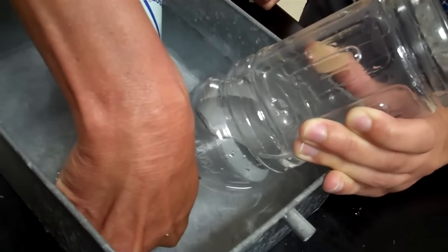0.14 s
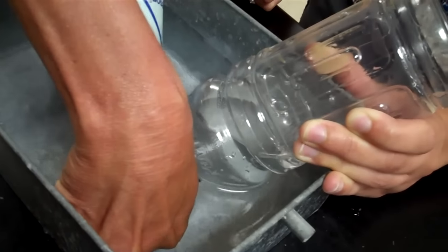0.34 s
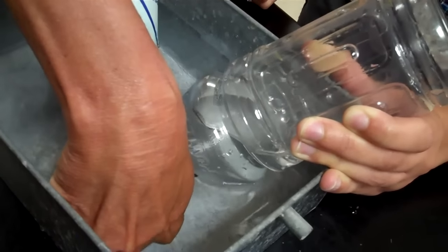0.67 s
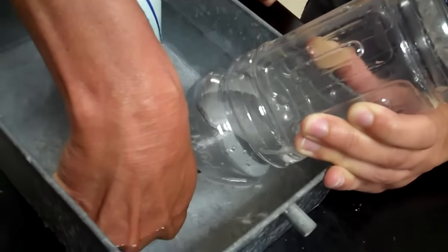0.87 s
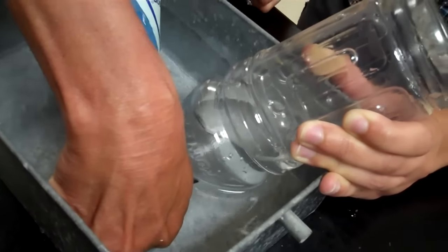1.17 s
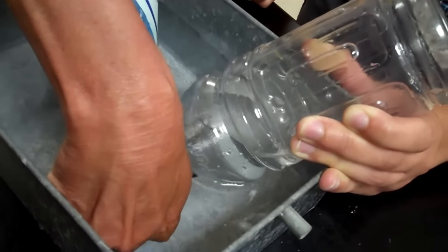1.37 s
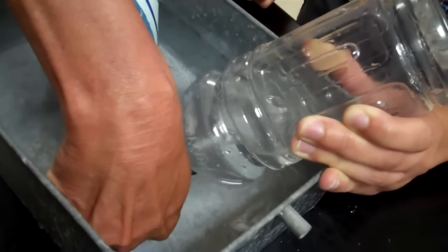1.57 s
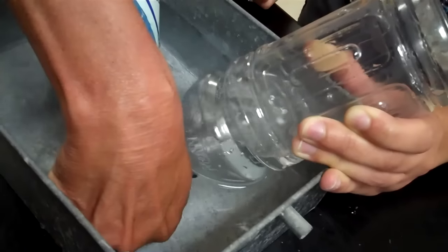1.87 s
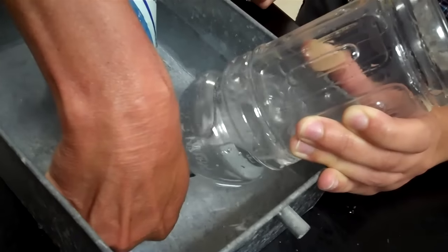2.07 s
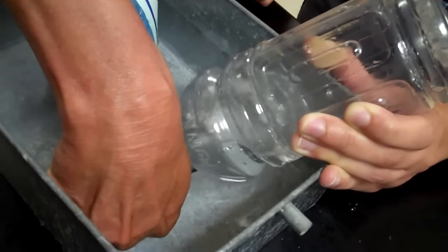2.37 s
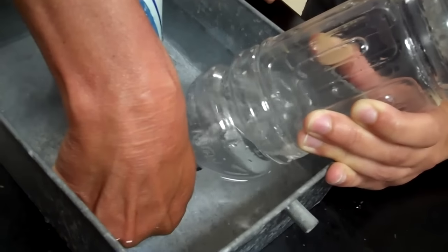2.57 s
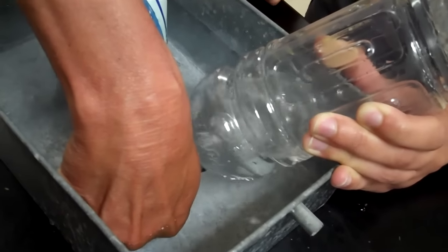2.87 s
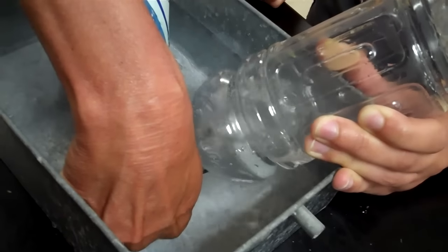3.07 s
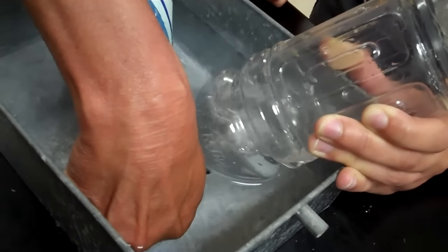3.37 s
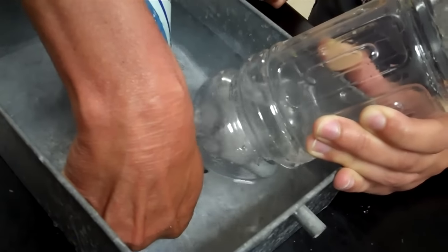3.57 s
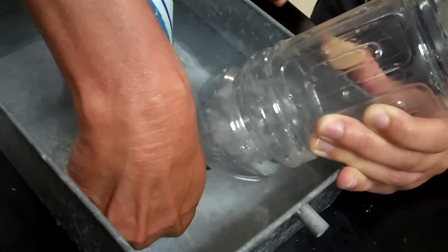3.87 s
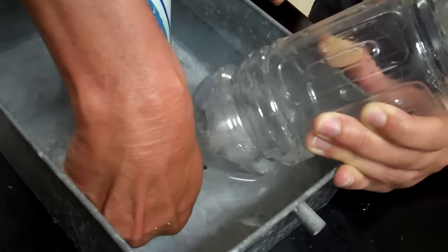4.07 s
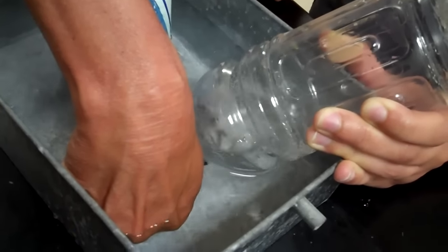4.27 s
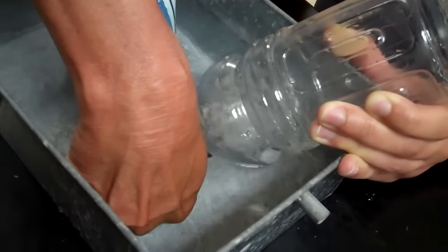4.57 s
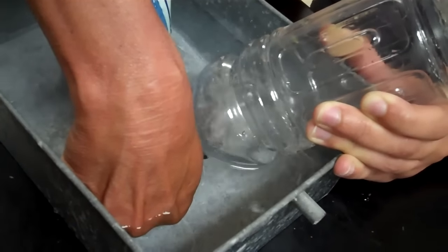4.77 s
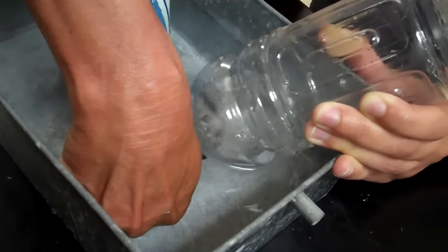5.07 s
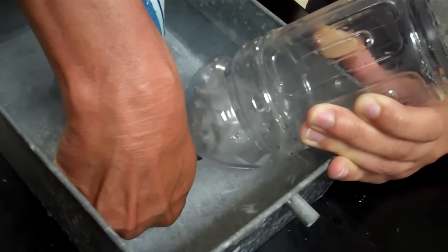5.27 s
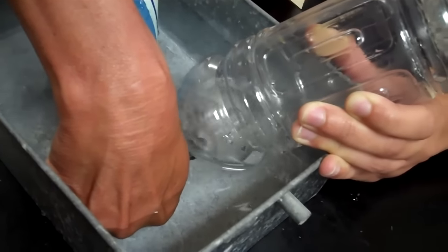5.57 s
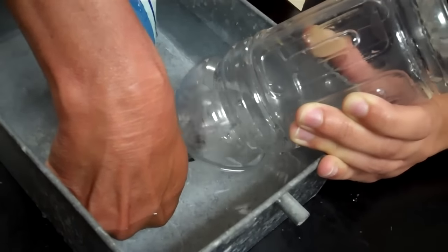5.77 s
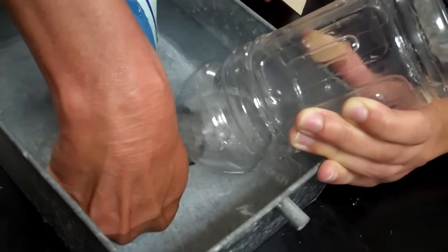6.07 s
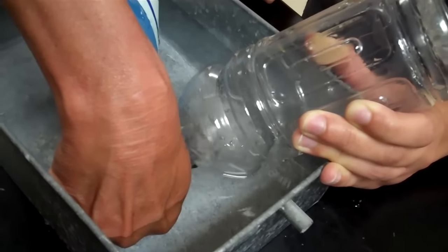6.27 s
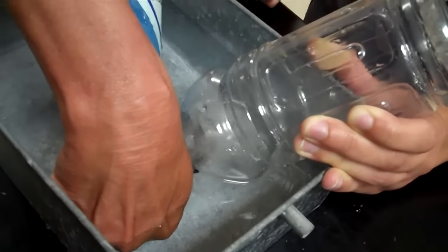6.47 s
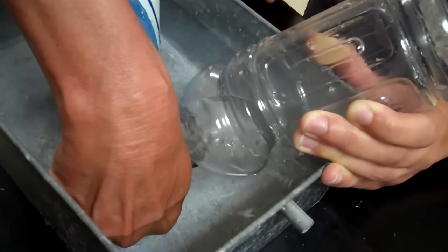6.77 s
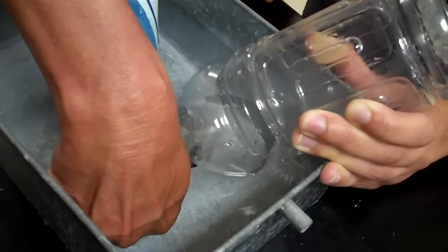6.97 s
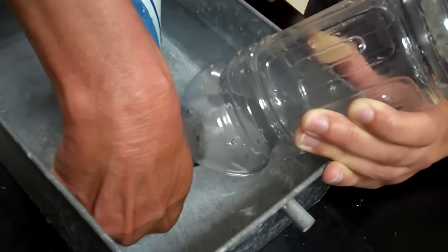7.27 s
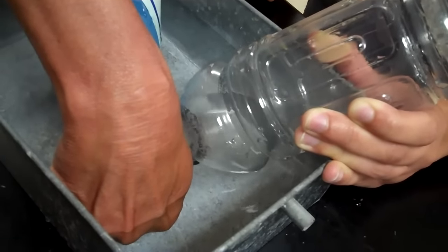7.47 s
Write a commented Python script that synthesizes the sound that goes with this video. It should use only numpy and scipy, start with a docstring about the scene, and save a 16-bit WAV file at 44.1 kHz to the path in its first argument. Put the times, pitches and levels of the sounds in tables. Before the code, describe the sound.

Gas bubbles steadily into an upturned plastic bottle in a tub of water, glugging rapidly with small sharp pops.

```python
"""Gas from a can bubbles into an upturned plastic bottle in a metal tub of water, close to a camera.
First a faint hiss fades away in a quiet room. From 1.25 s large bubbles leave the nozzle many times a
second; each oscillates as a spring of gas loaded by water and excites the bottle's resonances. Smaller
ones split off and ring higher, and tiny ones burst at the surface with sharp ticks. From about 5 s to
7.2 s the gas drives out most of the water: the resonances shift and the bubbles decay sooner."""
import sys
import numpy as np
from scipy import signal
from scipy.fft import rfft, irfft, next_fast_len
from scipy.io import wavfile

SR = 44100
rng = np.random.default_rng(int(sys.argv[2]) if len(sys.argv) > 2 else 0)


def to_wav(sig):
    """Store sig (one row per channel, or 1-D mono) as 16-bit WAV at the path in sys.argv[1].

    Samples outside -1..1 are clipped; the rate is SR.
    """
    pcm = np.clip(np.atleast_2d(sig), -1, 1) * 32767
    pcm = np.round(pcm).astype(np.int16)
    wavfile.write(sys.argv[1], SR, pcm.T)  # frames by channels


N = 336483

# room air and microphone hiss: (frequency [Hz], relative spectral level [dB])
AIR_SPECTRUM = [(12, -32), (20, -10.5), (102, -16.5), (142, -7), (210, -8.5), (247, -9), (326, -16),
                (364, -10), (454, -16), (707, -9), (985, -16.5), (3230, -27), (7010, -30.5), (13600, -34.5),
                (14800, -37)]
# likeness of that noise in left and right: (frequency [Hz], correlation [-1..1])
AIR_CORRELATION = [(60, 0.66), (180, 0.98), (540, 0.84), (1600, 0.48), (4790, -0.1), (14300, 0.0078)]
# hiss before the flow starts: (time [s], level [dB])
LEAK_LEVELS = [(0.03, -76), (0.218, -64.5), (0.4, -67), (0.55, -80)]
# its band filter, applied twice: (frequency [Hz], bandwidth [Hz], gain [dB])
LEAK_MODES = [(5080, 320, 3.6), (6160, 330, 0.57)]
# bottle and tub resonances at three water levels: (frequency [Hz], bandwidth [Hz], gain [dB])
FULL_MODES = [(264.6, 27, 5.5), (448.7, 27.5, 10), (573, 80, 1.5), (846, 15.4, 3), (1210, 90, -6),
              (1604, 71, 5), (2170, 30, -4), (2530, 42, -1.5)]
HALF_MODES = [(271, 57, -1.5), (459, 44, 5), (616, 110, -1.5), (850, 28, 8), (1210, 130, -5),
              (1694, 160, 8), (2650, 60, -11)]
DRAINED_MODES = [(258, 92, 4.5), (460, 150, 7), (650, 260, 2.5), (920, 180, 8), (1250, 130, -2.5),
                 (1683, 84, 10.5), (2640, 67, -14)]
# relative levels of the froth: (time [s], large bubbles [dB], middling bubbles [dB], fizz [dB])
FROTH_LEVELS = [(1.25, -71, -36, -77), (1.39, -55, -45.5, -72), (2.81, -52.5, -44, -66.5),
                (4.61, -53, -40, -60), (6.31, -52.5, -42.5, -59.5), (7.63, -68.5, -44, -62.5)]
# colour of the fizz: (frequency [Hz], gain [dB])
FIZZ_FILTER = [(3000, 11), (4500, -8), (6300, 6), (8200, 6.5), (9500, 4), (14000, -32)]
# tiny bubbles bursting at the surface:
# (time [s], peak level [dB], frequency [Hz], length [cycles], left over right [dB], splash re peak [dB])
BURSTS = [(1.246, -43.5, 3680.0, 8.3, -5, 6), (1.6555, -44, 7640, 8.6, 13, -16),
          (1.672, -45, 3830, 11, 1.0, 3), (1.8083, -27, 7800, 6.3, 16, -28),
          (1.8637, -41.5, 7470, 41.5, 9, -30.5), (1.996, -41.0, 6550.0, 12, -1, -26.5),
          (2.041, -36.5, 7600, 5.3, 11.0, -28.5), (2.5426, -31, 7100, 4, 5, -27),
          (2.7314, -24.5, 5960, 2.8, 0, -20), (2.825, -42, 6560, 37, 0, -25),
          (2.8356, -27.5, 7200, 6.3, 5, -22), (2.8507, -31.5, 7390.0, 14, 9.0, -18),
          (2.8826, -22.5, 7200, 8.9, 6, -6), (2.8842, -22.5, 7300, 16, 10, -27),
          (2.887, -16, 6900, 6.1, 11, -19), (3.038, -41, 8230.0, 22.4, 10.5, 0),
          (3.043, -38, 3550, 28, -2, 9), (3.0519, -10, 7470, 5.4, 9.0, -15),
          (3.17, -36, 7320.0, 7.6, 8, -20), (3.242, -39, 4400, 7.9, -4, 0),
          (3.258, -30.0, 6160, 10.9, -7.5, -14), (3.3338, -24, 7230, 10.5, 6, -44),
          (3.479, -24.5, 6470, 7, -4, -17), (3.5581, -34.5, 4400, 4.2, -4, -17),
          (3.565, -22, 8000, 4.6, 9, -31), (3.5683, -28, 7900, 15.5, 13.0, -32),
          (3.6056, -20, 6200, 7.8, -4.0, -7), (3.632, -30, 6360, 5.6, -2.0, -24),
          (3.8192, -39, 8300, 20, 21, -29.5), (3.8377, -36, 3760, 17, -1.0, -5),
          (3.972, -38.5, 7170.0, 13, 5.0, -29.5), (4.0125, -26.5, 6900, 4.1, 3.5, -38),
          (4.0588, -37, 6400, 13.4, -3.5, -27), (4.1369, -27, 7250, 8.4, 14, -9),
          (4.1564, -33, 6960, 5.3, 3.5, -21.5), (4.2372, -38, 6630.0, 8.9, 1.0, -15.5),
          (4.2524, -36, 5880.0, 6.6, -8, -17), (4.3125, -38.0, 6100, 6, -8.5, -8),
          (4.344, -19, 6600, 8.2, -1, -35), (4.385, -9, 5980, 7.2, -1, -24),
          (4.481, -36, 6800.0, 6.7, 7, -2), (4.4851, -22, 6800, 2.6, 0, -13),
          (4.5658, -23, 6600, 6.9, 2, -4.5), (4.657, -27.5, 7670.0, 7.7, 13, -25),
          (4.6662, -19.0, 7400, 5.8, 8, -41), (4.7221, -42, 7170.0, 6.5, 6, -23),
          (4.7826, -33, 6600, 10, 2.5, 1), (4.7885, -34, 6140.0, 9.0, -5, -11),
          (4.824, -44, 7150, 16, 6, -1), (4.829, -19, 5940, 9.2, -3.5, -19),
          (4.9963, -25.5, 6850, 16, 1, -8.5), (5.0484, -38, 5140, 6.5, -4, -5),
          (5.065, -25.5, 7540, 9.4, 11, -22), (5.1125, -7.5, 6430, 13.7, 0, -29),
          (5.1573, -33.0, 6950, 3.6, 10, -10), (5.2341, -46, 3570, 7.6, 1, 2),
          (5.263, -21.5, 6240, 7.2, -1, -37.5), (5.3182, -42, 6240, 18, -5, -1),
          (5.33, -37.5, 5470.0, 7.8, -6, -22.0), (5.3347, -38.5, 4100, 6.8, 2.0, -26),
          (5.3363, -30.5, 8800, 7.8, 16, -28.5), (5.442, -41, 6700, 5.6, 6.5, -13),
          (5.4536, -46, 5430.0, 9.4, -3.5, -21), (5.4768, -28, 5700, 7.6, -4, -36.0),
          (5.5063, -31.5, 7100, 12, 5.5, -21), (5.583, -41, 6050, 13.2, -6.5, 2),
          (5.587, -25, 6700.0, 8.8, 4, -6), (5.6723, -38.5, 6350.0, 5.3, -4.0, -13.5),
          (5.6796, -41.5, 4030.0, 4.7, -0.5, -2), (5.7433, -31.5, 6200, 6.7, -6, -20.5),
          (5.8885, -39, 6200, 11, -2, -23), (5.9155, -44, 8100, 10, 15, -12),
          (6.007, -31.5, 6500, 5.5, 5, -14), (6.0171, -27.5, 5570, 8.3, -4.5, -26),
          (6.0681, -26, 5340, 8.5, -2, -37), (6.136, -25, 5000, 4.3, 5, -26),
          (6.1416, -26.5, 5300, 7.6, -6, -30), (6.2313, -31, 6460.0, 6.4, 5, -29.5),
          (6.2397, -33.5, 5700, 14, -6.5, -35), (6.393, -44.5, 6200, 18, -4.0, -13),
          (6.4048, -38.5, 5300.0, 7.3, -2.0, -32), (6.4458, -44.5, 3500, 16, -0.5, -9.5),
          (6.6214, -37, 9150, 7.2, 18, -10), (6.6244, -15, 4900, 11, -2.0, -34),
          (6.6851, -30, 4160, 15, 0, -25), (6.6854, -25.5, 6140, 11, -4.0, -13),
          (6.7018, -30.5, 8600, 6.4, 15, -25), (6.7069, -24.5, 5980, 23, -3, -22),
          (6.784, -24, 6440, 6.8, -3, -38), (6.8877, -35, 8030, 65.3, 8, -16),
          (6.8896, -22, 6700, 6.4, 0, -23), (6.9631, -45.5, 3550, 22, -1, 1.5),
          (7.0231, -25.5, 5840, 11.6, -3, -22), (7.056, -41, 5600, 12, -2, -22),
          (7.1841, -18.5, 6180, 7.7, -3, -38.0), (7.2196, -35.5, 6000, 19, -6, -18),
          (7.2935, -35, 7300, 6.3, 4.0, -21), (7.323, -42, 7800, 12, 11, -31),
          (7.4004, -37.5, 6180.0, 5.3, -4.5, -24)]
# smaller bubbles splitting off, and a few bloops near 820-840 Hz that trail large bubbles after 5.1 s: (time
# [s], relative peak level [dB], frequency [Hz])
SMALL_BUBBLES = [(1.248,-32.5,1610),(1.349,-44,1520),(1.402,-36,1124),(1.434,-37,1096),(1.661,-33.5,1080),(1.669,-35.5,2650),(1.8087,-33,1113),(1.952,-36,1110),(2.0208,-35,1210),(2.055,-44,1080),(2.0678,-30,1170),(2.125,-44,1315),(2.1913,-42.5,1110),(2.224,-43,1070),(2.291,-41,1175),(2.3625,-34,1400),(2.41,-34.5,1180),(2.46,-42,1430),(2.566,-41,1570),(2.8835,-37.5,1160),(2.911,-43,1280),(3.0422,-35.5,1280),(3.054,-28,1526),(3.155,-37.5,1165),(3.2397,-56,1470),(3.258,-46,1550),(3.26,-38,2810),(3.2944,-41,1240),(3.337,-38,1490),(3.385,-41.5,1260),(3.432,-26.5,1300),(3.491,-39,1250),(3.608,-30,1520),(3.605,-29.5,2340),(3.606,-27.5,2800),(3.686,-49,1180),(3.703,-34.5,1490),(3.705,-39,1780),(3.707,-41,2230),(3.747,-27.5,1310),(3.8081,-36.5,1203),(3.838,-31.5,1260),(3.839,-34,1960),(3.9442,-35.5,1166),(4.037,-37,1550),(4.0583,-31.5,1726),(4.127,-33.5,1940),(4.137,-33,2870),(4.238,-28,1276),(4.288,-38,1304),(4.3423,-35,1850),(4.385,-34.5,1210),(4.453,-38.5,1740),(4.5528,-33,1640),(4.648,-36.5,1810),(4.667,-32.5,1170),(4.739,-39,1620),(4.785,-24,1335),(4.828,-30,2460),(4.924,-35.5,1380),(4.984,-44,1180),(4.993,-33.5,1950),(5.053,-40,1580),(5.092,-35.5,1210),(5.116,-31,1400),(5.13,-28.5,810),(5.1678,-35.5,1610),(5.2083,-35.5,1650),(5.234,-29.5,1850),(5.2526,-33,1180),(5.282,-38,1560),(5.3186,-39,1230),(5.324,-33.5,820),(5.417,-31.5,1720),(5.462,-47,1190),(5.49,-26.5,1700),(5.497,-35,843),(5.588,-32,1710),(5.619,-43,1240),(5.6368,-37.5,1660),(5.668,-31.5,1300),(5.679,-38,2970),(5.748,-42,1060),(5.7778,-31.5,1240),(5.78,-34,1680),(5.815,-40,2470),(5.858,-37.5,1890),(5.9698,-32.5,1170),(5.987,-32.5,823),(5.9958,-36,1180),(6.1122,-46,1820),(6.1365,-37,1770),(6.192,-35,1490),(6.2437,-35,1170),(6.278,-33.5,1095),(6.446,-28,1254),(6.5273,-39,1420),(6.5774,-58,1630),(6.629,-31.5,2510),(6.6503,-41.5,1224),(6.686,-39,1710),(6.7048,-29.5,2550),(6.74,-39.5,1230),(6.786,-29,1580),(6.8897,-42,3600),(6.9083,-35.5,1524),(6.9446,-43,1660),(6.9646,-30,2670),(7.0033,-46.5,1760),(7.085,-53,1660),(7.145,-48,1620),(7.185,-36.5,1320),(7.2964,-47,1360),(7.3443,-40,980),(7.347,-39,1610),(7.3833,-34,1060),(7.4234,-38.5,1220),(7.4636,-41.5,1030),(7.475,-45.5,2590),(7.506,-37.5,1406),(7.5796,-41.5,1034),(7.6209,-34,1440)]
# large bubbles leaving the nozzle: (time [s], peak level [dB], frequency [Hz], follower re peak [dB])
LARGE_BUBBLES = [(1.247,-27,460,-30),(1.352,-34,530,-17),(1.401,-38.5,490,-29),(1.442,-34,470,-13),(1.581,-33,490,-26),(1.634,-41,470,4.5),(1.714,-43,234,-29),(1.783,-39.5,440,-3),(1.858,-46.5,429,-26),(1.92,-48.5,438,9),(2.02,-41,458,7),(2.064,-47,446,-7),(2.133,-37,535,-31),(2.189,-39.5,492,-8),(2.212,-36.5,460,-11),(2.303,-32,510,-11.5),(2.37,-40.5,563,-16),(2.405,-39.5,484,-18),(2.464,-32.5,490,-27),(2.513,-34.5,490,-4.5),(2.571,-37.5,570,-16),(2.609,-41.5,446,-24),(2.669,-34,454,-4.5),(2.717,-32.5,485,-6.5),(2.782,-31.5,446,-31),(2.816,-32.5,438,-21),(2.872,-34,465,-23),(2.921,-30.5,586,-13),(2.95,-37,430,-27),(2.996,-39.5,442,-3),(3.04,-52,425,4),(3.112,-37,445,-14),(3.173,-29.5,412,-12),(3.24,-31,443,-29),(3.312,-32,477,-10.5),(3.343,-32.5,407,-30),(3.381,-40.5,432,-4.5),(3.438,-28.5,420,-31),(3.502,-30,437,-37),(3.542,-40,429,-20),(3.598,-30,407,-14.5),(3.663,-37.5,510,-21),(3.685,-37,513,-9),(3.747,-31.5,506,-10),(3.784,-35,449,-29),(3.809,-42,430,-32),(3.891,-51,262,-22),(3.923,-31.5,470,-29),(4.013,-31.5,484,-30),(4.053,-38.5,416,-26),(4.096,-39,494,-27),(4.124,-29,414,-19),(4.207,-33.5,440,-25),(4.237,-33.5,460,-12),(4.283,-55,278,1),(4.354,-34,464,-11),(4.374,-36,570,-17),(4.424,-39,604,-14),(4.45,-39,407,-25),(4.512,-38.5,418,-5),(4.552,-30,438,-35),(4.607,-43,228,-25),(4.627,-35.5,458,-19),(4.666,-37.5,422,-6.5),(4.74,-38.5,417,-21),(4.785,-38.5,445,-30),(4.821,-29.5,493,-15),(4.874,-33.5,465,-11),(4.91,-42.5,412,-16),(4.957,-34,540,-9),(4.983,-29.5,458,-11.5),(5.057,-32,446,-30),(5.089,-29.5,460,-11),(5.129,-33,565,-9),(5.163,-52,290,-19),(5.208,-32,470,-25),(5.236,-34,430,-2.5),(5.318,-35.5,580,-15),(5.386,-33.5,492,-22),(5.416,-35.5,437,-13),(5.476,-31,553,-7),(5.541,-35.5,440,-15),(5.57,-41,404,-19),(5.64,-34.5,450,-8),(5.668,-32.5,454,-30),(5.725,-39,269,-21),(5.744,-36.5,461,-15),(5.78,-37,413,-3.5),(5.838,-35.5,454,-9),(5.911,-37,273,-22),(5.942,-41,406,-23),(5.985,-43.5,443,3),(6.032,-43,630,4),(6.093,-36,261,-14),(6.116,-37,490,3),(6.137,-27,450,-39),(6.187,-37.5,284,-18),(6.208,-33.5,440,-17),(6.244,-34,560,-5),(6.306,-37,590,-18),(6.352,-37.5,433,-16),(6.413,-35,488,-29),(6.444,-36,623,1),(6.489,-46,656,-15),(6.507,-41,463,-7),(6.585,-29.5,552,-10.5),(6.662,-28.5,410,-13),(6.686,-35,580,-25),(6.733,-40,316,-12),(6.756,-36.5,442,-20),(6.784,-39,552,-0.5),(6.827,-49,680,-2),(6.866,-43,467,-18),(6.903,-38,365,-7.5),(6.94,-34.5,615,-8),(6.992,-34,376,-14),(7.034,-38,615,-23),(7.078,-38.5,387,-13),(7.132,-40.5,402,-1),(7.18,-48,649,4),(7.23,-48.5,389,-5),(7.254,-40,640,-19),(7.289,-52,419,0),(7.343,-44,420,-14),(7.426,-54,476,-16),(7.463,-41,430,-29),(7.548,-39,430,-12),(7.62,-35.5,466,-11)]

FULL_S, HALF_S, DRAINED_S = 5.04, 6.26, 7.24  # times of the three water levels
DRAINED_RING = 0.6  # share of a bubble's decay time left once drained


def amp(db):
    """Amplitude ratio of a level in dB."""
    return 10 ** (np.asarray(db) / 20)


def unit(x):
    """Normalisation to an rms of 1."""
    return x / np.sqrt(np.mean(x ** 2) + 1e-20)


def along(points, hz):
    """Interpolation of (frequency, value) points on a logarithmic frequency axis."""
    f, v = np.transpose(points)
    return np.interp(np.log(hz + 1), np.log(f + 1), v)


def envelopes(rows):
    """Linear interpolation of each level column to every sample; silent before the first row."""
    times, *columns = np.transpose(rows)
    return [np.interp(np.arange(N) / SR, times, db, left=-120) for db in columns]


def filtered(x, response):
    """Linear filtering: the spectrum of x is multiplied by a frequency response."""
    n = x.shape[-1]
    padded = next_fast_len(n + 2500)
    return irfft(rfft(x, padded) * response(np.fft.rfftfreq(padded, 1 / SR)), padded)[..., :n]


def resonances(modes):
    """Modal superposition: the summed response of damped resonators of alternating sign."""
    return lambda f: sum((-1) ** k * amp(db) * 1j * f * width / (hz * hz - f * f + 1j * f * width)
                         for k, (hz, width, db) in enumerate(modes))


def bubbles(hz, t60, rise, attack_s, samples):
    """Damped oscillators, one a row: each falls 60 dB in t60 seconds as its pitch climbs by the share rise."""
    t, hz, t60 = np.arange(samples) / SR, hz[:, None], t60[:, None]
    phase = 2 * np.pi * hz * t * (1 - rise / 4 + rise * t / (2 * t60))
    return np.sin(phase) * amp(-60 * t / t60) * (1 - np.exp(-t / attack_s)) ** 2


def scattered(rows, t60, wet_db, gap_s):
    """Reverberation: each row is convolved with its own stereo echoes from tub and walls."""
    t = np.arange(min(rows.shape[1], SR // 8)) / SR
    echoes = rng.standard_normal((len(rows), 2, len(t))) * amp(-60 * t / t60) * (t > gap_s)
    echoes *= amp(wet_db) / np.linalg.norm(echoes, axis=2, keepdims=True)
    echoes[..., 0] = 1  # direct path
    return signal.fftconvolve(rows[:, None], echoes, axes=2)[..., :rows.shape[1]]


def placed(times, peak_db, sounds):
    """Superposition of stereo sounds, each at its own time and peak level."""
    out = np.zeros((2, N + SR))
    for start, db, sound in zip(times, peak_db, sounds):
        out[:, round(start * SR):][:, :sound.shape[1]] += amp(db) * sound / np.abs(sound.mean(0)).max()
    return out[:, :N]


def draining(times, full, drained):
    """Linear change of a quantity as the bottle drains."""
    return np.interp(times, (FULL_S, DRAINED_S), (full, drained))


def in_bottle(x, times, direct_db, top_hz):
    """Forced resonance: a direct path adds to modes set by the water level; the water dulls the treble."""
    def responses(f):
        passband = (1j * f / (170 + 1j * f)) ** 2 / (1 - (f / top_hz) ** 2 + 1j * f / top_hz) ** 2
        modal = [resonances(modes)(f) for modes in (FULL_MODES, HALF_MODES, DRAINED_MODES)]
        return (np.reshape(modal, (3,) + (1,) * (x.ndim - 1) + (-1,)) + amp(direct_db)) * passband
    shares = [np.interp(times, (FULL_S, HALF_S, DRAINED_S), row) for row in np.eye(3)]
    return sum(share * stage for share, stage in zip(shares, filtered(x, responses)))


def room_air():
    """Partial coherence: steady room noise is alike in both channels only at low frequencies."""
    def mid_and_side(hz):
        angle = np.arccos(np.clip(along(AIR_CORRELATION, hz), -1, 1)) / 2
        return amp(along(AIR_SPECTRUM, hz)) * [np.cos(angle), np.sin(angle)]
    mid, side = filtered(rng.standard_normal((2, N)), mid_and_side)
    return amp(-55) * np.array([mid + side, mid - side]) / np.std(mid)


def leak():
    """Band-limited noise: a thin hiss in two bands swells and fades away."""
    level_db, = envelopes(LEAK_LEVELS + [(0.75, -120)])
    hiss = filtered(rng.standard_normal((2, N)), lambda f: resonances(LEAK_MODES)(f) ** 2)
    return amp(level_db) * unit(hiss)


def swarm(times, db, count, low_hz, log_span, within_s, cycles, attack_s, pan_db):
    """Resonance rises as size falls: count bubbles of random size ring soon after each time."""
    smallness, delay, faintness = np.moveaxis(rng.random((len(times), count, 3)), 2, 0)
    hz = (low_hz * np.exp(log_span * smallness)).ravel()
    rings = bubbles(hz, cycles / hz, rise=0.048, attack_s=attack_s, samples=1000)
    stereo = rings[:, None] * amp(rng.normal(0, pan_db, (len(rings), 2, 1)))
    late = delay ** 1.6  # most come early
    level_db = db[:, None] - 10 * faintness - 6 * late - 5 * smallness
    return placed((times[:, None] + within_s * late).ravel(), level_db.ravel(), stereo)


def froth():
    """Incoherent summation: faint bubbles merge into a gurgle in the bottle and fizz on the surface."""
    large_db, middling_db, fizz_db = envelopes(FROTH_LEVELS)
    births, birth_db = np.transpose(LARGE_BUBBLES)[:2]
    large = swarm(births, np.zeros_like(births), count=2, low_hz=194.7, log_span=0.508,
                  within_s=0.04, cycles=20, attack_s=0.0026, pan_db=1.7)
    middling = swarm(births, 0.24 * birth_db, count=7, low_hz=410, log_span=1.498,
                     within_s=0.045, cycles=20.4, attack_s=0.0007, pan_db=0)
    clumps = rng.uniform(0, N / SR, 700)
    fizz = swarm(clumps, rng.normal(0, 4.5, len(clumps)), count=3, low_hz=4160, log_span=0.725,
                 within_s=0.022, cycles=16, attack_s=0.00032, pan_db=10)
    fizz = filtered(fizz, lambda f: amp(along(FIZZ_FILTER, f)))
    fizz = scattered(fizz, t60=0.032, wet_db=-0.5, gap_s=0.0027)[[0, 1], [0, 1]]  # each keeps its side
    gurgle = amp(large_db + 1.5) * unit(large) + amp(middling_db - 7.5) * unit(middling)
    gurgle = in_bottle(gurgle, np.arange(N) / SR, direct_db=-8.5, top_hz=2040)
    return gurgle + amp(fizz_db + 2.5) * unit(fizz)


def surface_bursts():
    """Transient radiation: a tearing film emits a tone pulse and a splash; tub and room reflect the pulse."""
    times, db, hz, cycles, pan_db, splash_db = np.transpose(BURSTS)
    t = np.arange(2200) / SR
    cycle = hz[:, None] * t
    progress = np.minimum(cycle / cycles[:, None], 1)
    pulses = np.sin(2 * np.pi * cycle * (0.9844 + 0.027 * progress)) * np.sin(np.pi * progress ** 0.52) ** 2
    tear = amp(-5.5 - 60 * t / 0.0018) * rng.standard_normal(pulses.shape)
    pulses += filtered(tear, lambda f: resonances([(7800, 3000, 0)])(f) ** 3)
    near = scattered(pulses, t60=0.01, wet_db=0, gap_s=0.001)  # tub walls
    near += amp(-25) * np.roll(near, round(0.013 * SR), axis=2)  # ceiling echo
    room = scattered(pulses, t60=0.1, wet_db=-13, gap_s=0.0015) - pulses[:, None]
    sides = amp(np.outer(pan_db / 2, [1, -1]))[..., None]
    splash = amp(-60 * t / 0.032) * (1 - np.exp(-t / 0.00022)) * rng.standard_normal((len(times), 2, len(t)))
    splash[:, 1] = 0.72 * splash[:, 0] + 0.42 * splash[:, 1]  # partly coherent channels
    splash = filtered(splash, lambda f: resonances([(3500, 3400, 0)])(f) ** 2)
    return placed(times, db, (near + room) * sides) + placed(times, db + splash_db, splash)


def small_bubbles():
    """Impulsive excitation: the neck of gas snaps as a bubble splits off; higher ones decay sooner."""
    times, db, hz = np.transpose(SMALL_BUBBLES)
    t60 = 0.04 * (1300 / hz) * draining(times, 1, DRAINED_RING)
    rings = bubbles(hz, t60, rise=0.15, attack_s=0.0004, samples=2200)
    t = np.arange(rings.shape[1]) / SR
    snap = amp(-2 - 60 * t / 0.045) * rng.standard_normal(rings.shape)
    rings += filtered(snap, lambda f: resonances([(hz[:, None], 1100, 0)])(f) ** 2)
    plinks = in_bottle(rings, times[:, None], direct_db=1, top_hz=3000)
    return placed(times - 0.001, db - 0.7, scattered(plinks, t60=0.14, wet_db=-11, gap_s=0.0047))


def followers():
    """Gliding resonance: a bubble trails each large one and bloops upward, less so as the bottle drains."""
    times, db, _, follower_db = np.transpose(LARGE_BUBBLES)
    hz = draining(times, 907.5, 907) * amp(rng.normal(0, 0.497, len(times)))
    rise = draining(times, 1.133, 0.28)[:, None]
    rings = bubbles(hz, np.full(len(times), 0.06), rise, attack_s=0.0078, samples=2600)
    bloops = in_bottle(rings, times[:, None], direct_db=-13.5, top_hz=1800)
    return placed(times + 0.0039, db + follower_db, scattered(bloops, t60=0.081, wet_db=-14.5, gap_s=0.0011))


def large_bubbles():
    """Volume oscillation: a large bubble pinches off softly and rings in its breathing mode as it rises."""
    times, db, hz, _ = np.transpose(LARGE_BUBBLES)
    stretch = amp(0.63 * (-36 - db) + rng.normal(0, 1.8, len(times)))  # louder ones decay sooner
    t60 = 0.044 * draining(times, 1, DRAINED_RING) * stretch
    rings = bubbles(hz, t60, rise=0.15, attack_s=0.005, samples=3200)
    t = np.arange(rings.shape[1]) / SR
    push = amp(2.5 - 60 * t / 0.027) * (1 - np.exp(-t / 0.00056)) * rng.standard_normal(rings.shape)
    rings += filtered(push, lambda f: 1 / (1 + 1j * f / 900) ** 2)
    glugs = in_bottle(rings, times[:, None], direct_db=-12, top_hz=1920)
    return placed(times - 0.0065, db, scattered(glugs, t60=0.47, wet_db=-17, gap_s=0.00068))


def scene():
    """Superposition: the pressures of all sources add at the microphones."""
    return large_bubbles() + followers() + small_bubbles() + surface_bursts() + froth() + leak() + room_air()


def record(dry):
    """Band limiting: the bass rolls off below 25 Hz and nothing sounds above 14.4 kHz."""
    return filtered(dry, lambda hz: (hz < 14400) * 1j * hz / (25 + 1j * hz))


dry = scene()
out = record(dry)
to_wav(out)
```